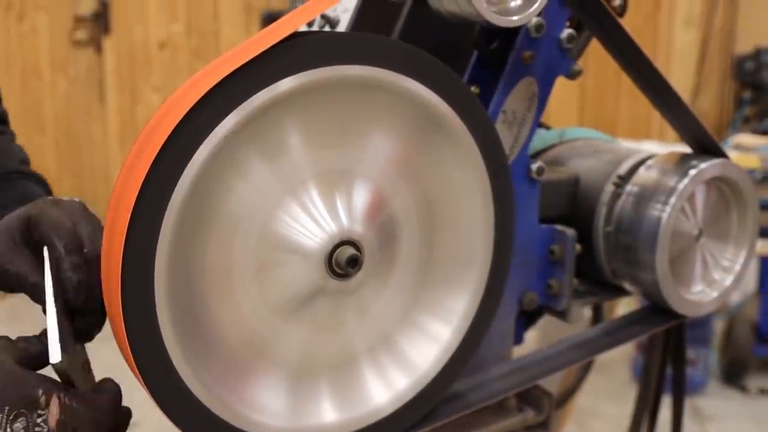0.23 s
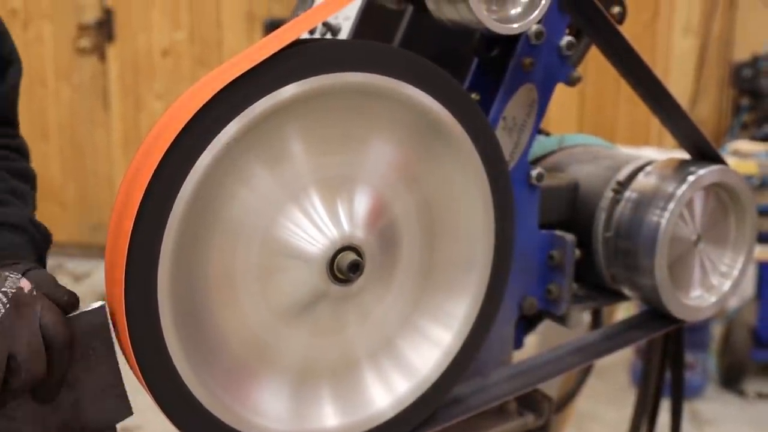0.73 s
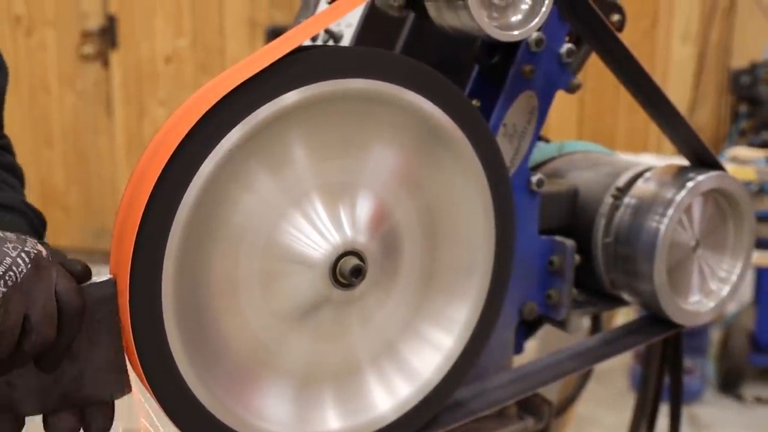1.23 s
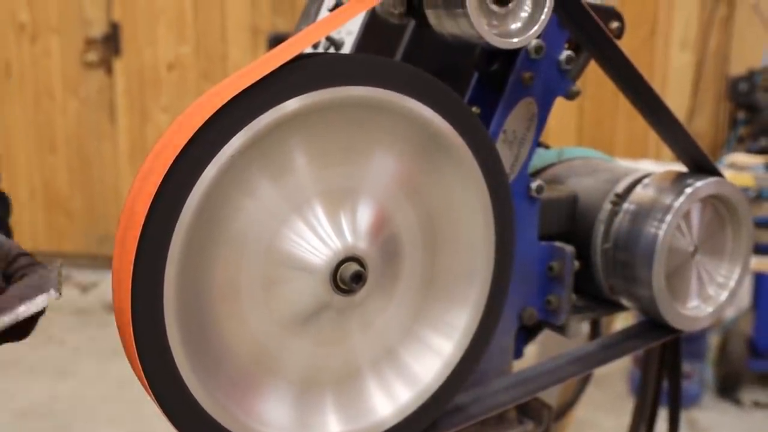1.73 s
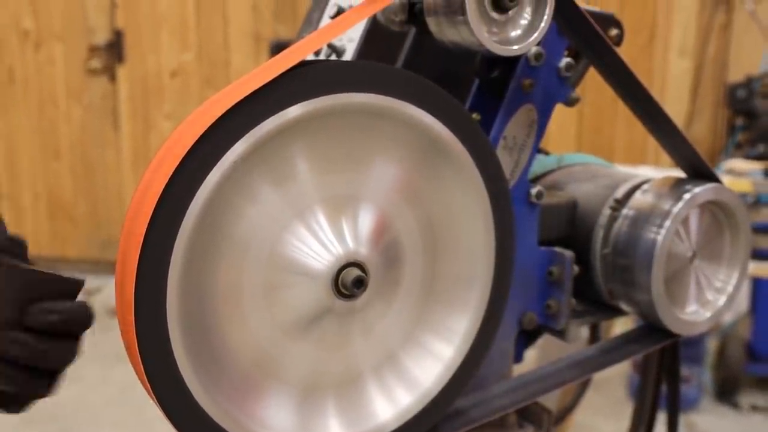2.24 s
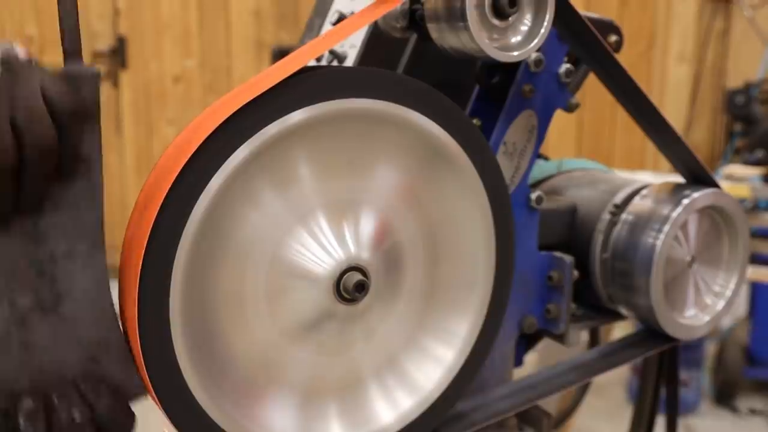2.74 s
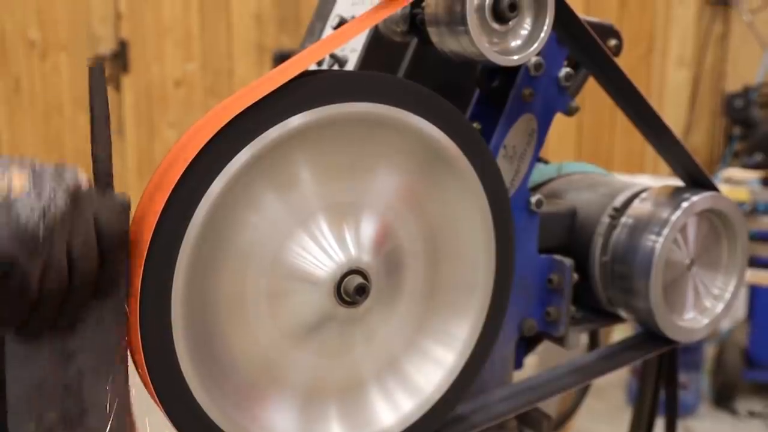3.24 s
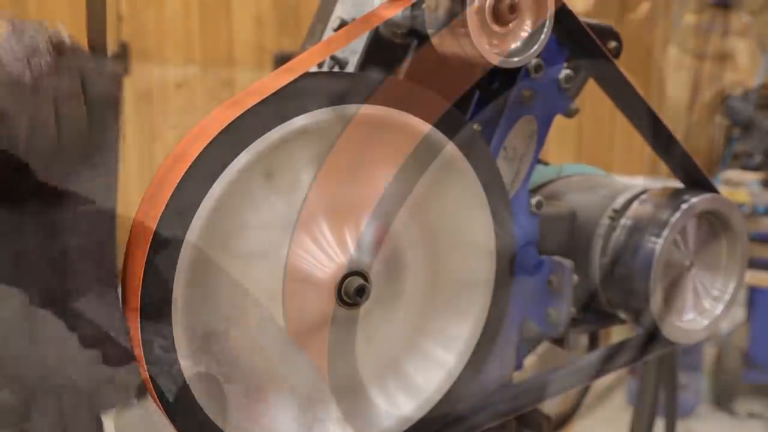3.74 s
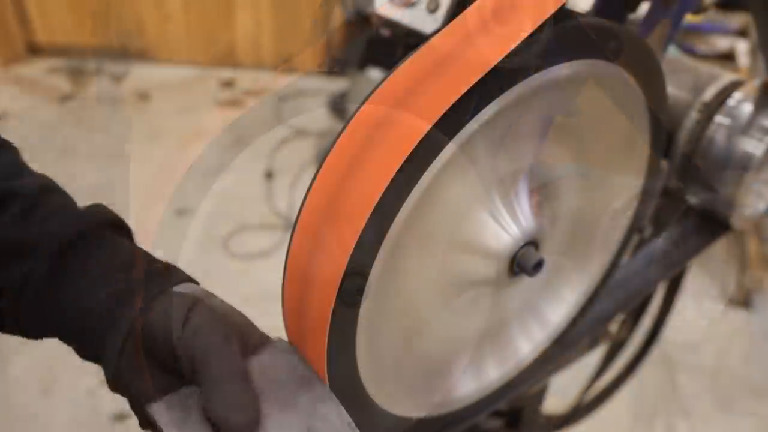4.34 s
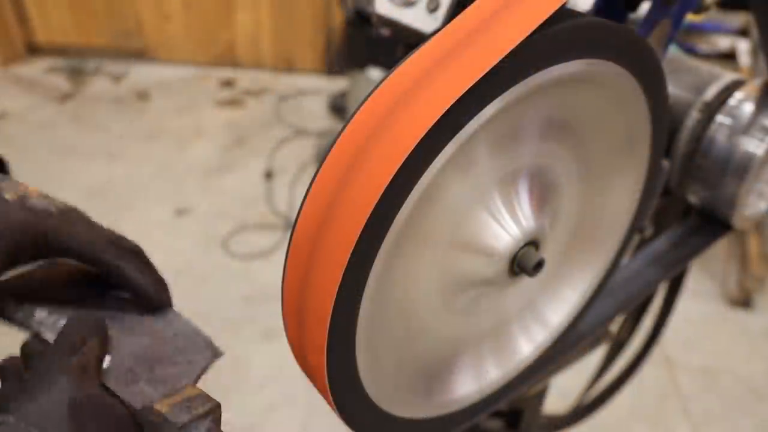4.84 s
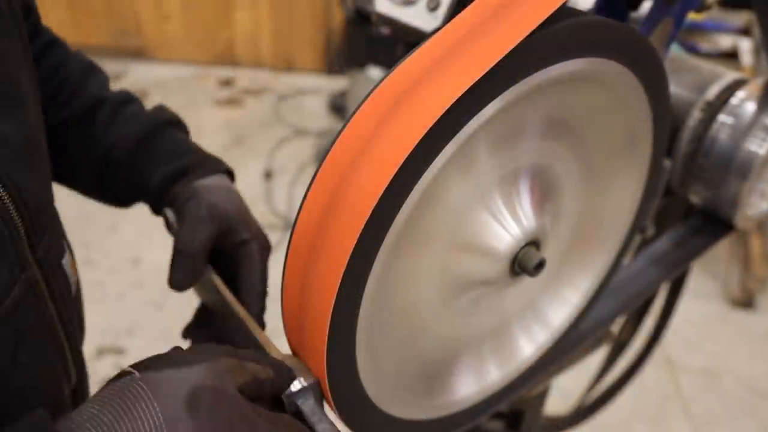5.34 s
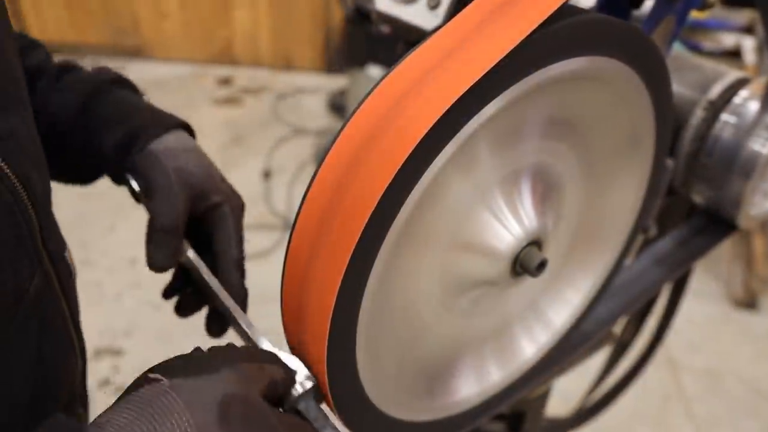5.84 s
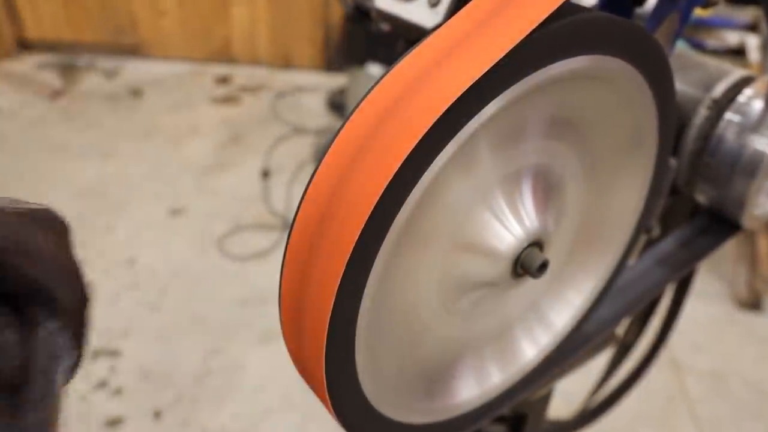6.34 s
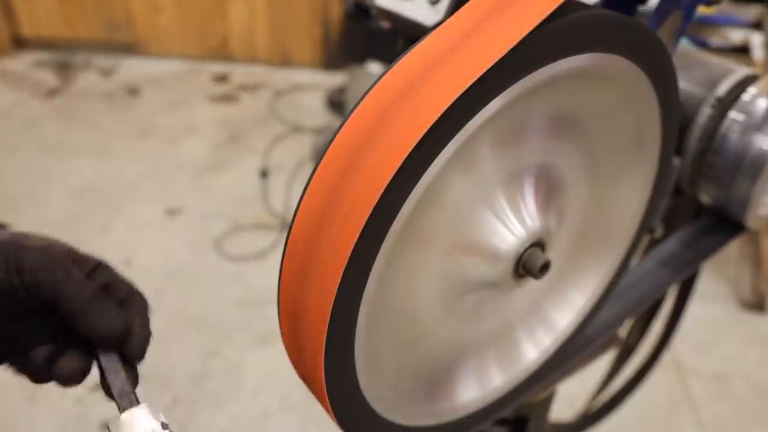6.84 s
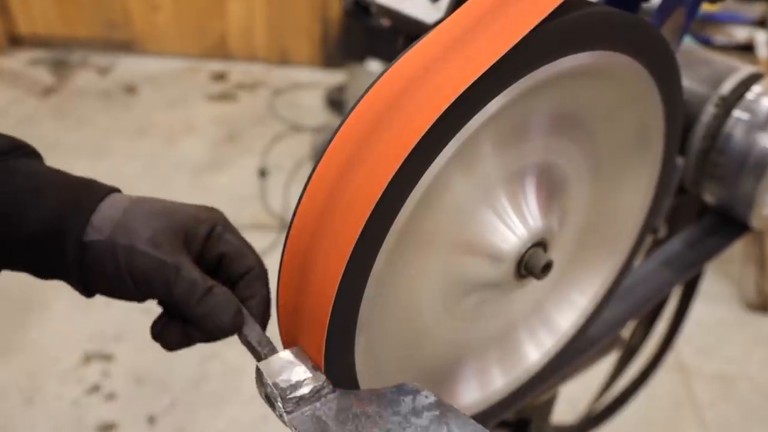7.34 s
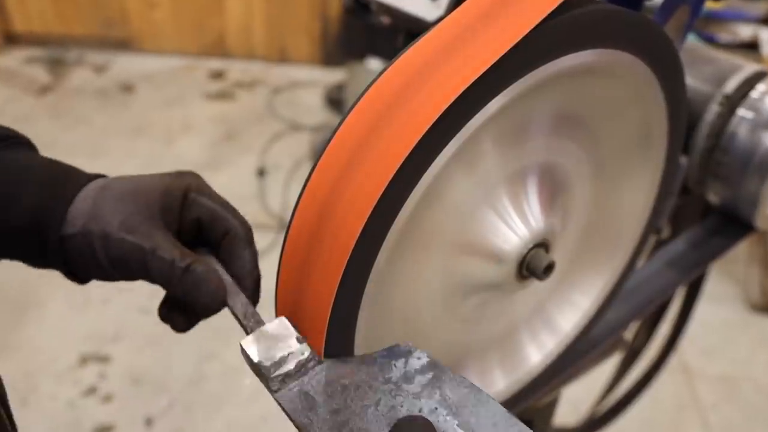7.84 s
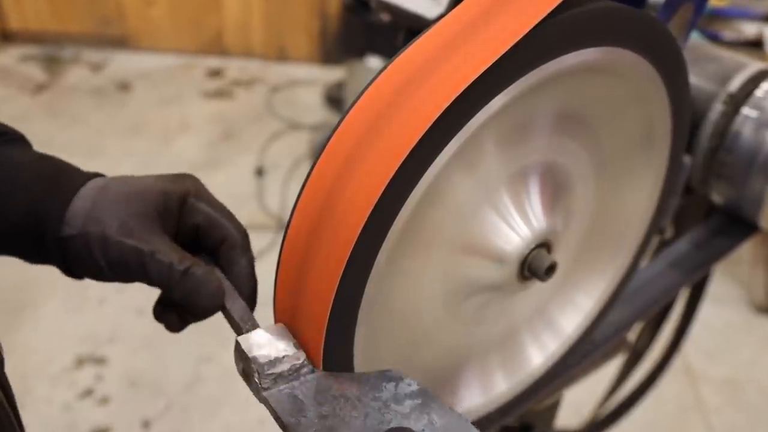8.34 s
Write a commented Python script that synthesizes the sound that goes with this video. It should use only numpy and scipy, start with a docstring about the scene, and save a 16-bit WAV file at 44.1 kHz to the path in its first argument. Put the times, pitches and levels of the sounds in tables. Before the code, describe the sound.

A belt grinder runs at constant high speed throughout, close by in a workshop: broad bright hiss, a rapid fluttering buzz from the repeating belt and a piercing cluster of motor whine. At 0 s a blade is just leaving the belt with a short scrape. From 0.9 to 1.6 s it grinds in strong, ringing passes, the motor humming lower and harder, with tiny squeals near the end. The machine runs free until two light knocks at 2.5 s, then uneven gritty presses follow to about 4 s. Between 3.7 and 4.9 s the sound crossfades to a second position with less whine; a thin squeal and a knock fall near 4 s. Short dabs come at 4.2-4.7 s, ending in a squeal and knock, then 5.1-6 s, with squeals near 5.8 s. Free running follows until faint, brief touches from 7.3 to 8.5 s, the hiss continuing to the end.

```python
"""A belt grinder runs in a workshop: the grit pattern of its belt repeats every lap, read out at belt speed.
A steel blade pressed on the belt loads the motor, makes the belt slip and rings under the grit;
it also squeals as shaped noise and knocks on the rest as decaying bursts.
Motor and wheels whine as sines that share one speed, over a hiss of air and rubber made of coloured noise.
The machine is heard from one place and then, after a fade, from another."""
import sys
import numpy as np
from scipy import signal
from scipy.fft import rfft, irfft
from scipy.io import wavfile
from scipy.ndimage import uniform_filter1d

SR = 44100
rng = np.random.default_rng(int(sys.argv[2]) if len(sys.argv) > 2 else 0)


def unload_audio(sound):
    """Save the sound as a 16-bit wav file, at the path given as the first command line argument."""
    columns = np.transpose(np.atleast_2d(sound))
    # keep every value between -1 and 1, then stretch to whole-number steps
    steps = np.round(np.clip(columns, -1, 1) * 32767)
    wavfile.write(sys.argv[1], SR, steps.astype(np.int16))


N = 379260
TIME, FREQ = np.arange(N) / SR, np.arange(N // 2 + 1) * SR / N  # s, Hz

# strong overtones of the lap: multiple, first_place_db, second_place_db
BELT_OVERTONES = [(6, -76, -78), (8, -66, -60), (10, -74, -72), (16, -66, -61), (24, -63, -58),
                  (25, -59, -60), (30, -66, -58), (41, -60, -60), (45, -55, -71), (54, -57, -59),
                  (57, -57, -56), (59, -53, -56), (64, -61, -55), (80, -51, -90), (97, -62, -54),
                  (101, -52, -56), (103, -56, -55), (122, -52, -58), (133, -51, -54), (135, -70, -53),
                  (140, -52, -54), (143, -52, -54), (164, -66, -56), (169, -48, -53), (170, -52, -59),
                  (177, -64, -50), (184, -55, -65), (198, -56, -51), (199, -52, -60), (201, -65, -55),
                  (208, -56, -53), (214, -49, -55), (222, -48, -52), (229, -53, -50), (233, -46, -54),
                  (237, -46, -56), (239, -47, -62), (242, -48, -58), (245, -51, -47), (251, -49, -61),
                  (254, -56, -46), (261, -50, -70), (263, -70, -48), (276, -44, -54), (278, -45, -48),
                  (281, -47, -46), (295, -45, -43), (297, -48, -45), (300, -45, -45), (312, -50, -44),
                  (315, -46, -45), (322, -43, -58), (323, -44, -60), (324, -46, -42)]
# weak overtones of the lap against the hiss: freq_hz, relative_db
WEAK_OVERTONES = [(150, -21), (300, 0), (1000, -10), (3000, -2.5), (6000, -4), (10000, -6), (15000, -1)]
# presses of the blade on the belt: start_s, length_s, load_hum_db, low_hum_db, ring_db, slip_percent
PRESSES = [(0, .09, -44, -55, -38, .1), (0.864, 0.37, -50.5, -72.5, -34, 0.02),
           (1.082, 0.3, -44.5, -56, -34.5, .04), (1.446, 0.17, -46.5, -58, -36, 0.098),
           (2.46, .17, -47, -66, -44, 0.061), (2.67, 0.092, -47.5, -60.5, -43, .04),
           (2.81, .05, -48, -65, -42, .07), (2.9, .27, -49.5, -63, -41, .09),
           (3.225, 0.11, -49, -68, -41, 0.037), (3.432, 0.069, -47.5, -65, -36.5, 0.057),
           (3.598, 0.13, -47, -57.5, -38, .08), (3.789, 0.043, -49, -66, -40, 0.13),
           (3.882, 0.057, -53, -61, -37, 0.15), (3.95, .04, -52, -66, -50, .14),
           (4.02, .07, -45, -61, -55, 0.15), (4.105, .02, -50, -68, -52, .13),
           (4.2, 0.076, -61, -79, -40, 0.1), (4.428, .04, -59, -74, -46, 0.076),
           (4.575, 0.045, -52, -76, -48, .1), (4.656, 0.056, -54, -72, -44, .12),
           (5.132, 0.054, -53, -69, -48, 0.021), (5.238, 0.069, -47.5, -71, -46, .03),
           (5.35, 0.087, -49.5, -68, -44, .04), (5.478, 0.11, -45, -60.5, -46, .07),
           (5.769, 0.094, -50, -62, -38, .14), (5.896, 0.079, -46.5, -59, -44, 0.13),
           (7.26, .04, -52, -69.5, -41, .02), (7.36, 0.044, -55, -70, -45, 0.022),
           (7.45, 0.14, -61, -67, -41, .06), (7.79, 0.038, -61, -74, -43, .08),
           (7.92, 0.09, -60, -63.5, -48, 0.098), (8.115, .05, -58, -63, -48, 0.16),
           (8.447, 0.09, -65.5, -67, -51.5, 0.096)]
# change of the ring over a longer press as the blade turns: start_s, change_db
BLADE_TURNS = [(.86, 7), (1.09, -9), (1.45, 2), (2.9, -4), (3.6, -12), (5.48, 3)]
# grit noise through the body of the blade, against its control: freq_hz, width_hz, relative_db
BODY_MODES = [(748, 92, -11), (999, 100, -17.5), (1076, 156, -10.5), (2780, 1200, -4), (5070, 1230, 4.5),
              (11000, 3700, 2)]
# ring of the blade common to both ports, against its control: freq_hz, width_hz, relative_db
RING_MODES = [(5956, 210, -3.5), (5570, 440, -3.5)]
# ring of the blade that differs between the ports: freq_hz, width_hz, relative_db
RING_SIDE_MODES = [(5750, 500, -3), (8500, 380, -3.5)]
# short squeals of the blade: start_s, length_s, freq_hz, width_hz, relative_db
SQUEALS = [(.05, .05, 8500, 450, -43), (1.36, .05, 8600, 350, -45), (1.58, .04, 8400, 350, -45),
           (3.98, .22, 9070, 130, -48), (4.22, .06, 6000, 200, -47), (4.69, .045, 6000, 220, -36),
           (5.76, .11, 8660, 350, -43), (5.76, .1, 13000, 250, -40), (5.93, .05, 11900, 500, -43),
           (7.95, .06, 5600, 200, -43)]
# knocks of the blade on the rest: start_s, burst_db, pitch_hz, t60_s, first_swing_db above the burst
KNOCKS = [(2.533, -48, 330, .1, 3), (2.552, -52, 240, .07, 3), (4.034, -49, 440, .25, 16),
          (4.078, -52, 300, .12, 4), (4.705, -56, 300, .06, 6)]
# hum of the loaded motor against the load hum: freq_hz, relative_db
LOAD_HUM = [(480.3, -15), (960.6, -.5), (1041, -12)]
# the one whine tone that swells and sinks: time_s, relative_db
SWELL = [(0.0, -51), (0.26, -55.5), (1.1, -47), (1.34, -55), (1.36, -47), (1.48, -59), (1.63, -55),
         (2.54, -54.5), (2.92, -48), (4.24, -61), (5.29, -48), (5.72, -52), (7.21, -48), (7.83, -51),
         (8.55, -47.5), (8.6, -53)]
# whine of motor and wheels: freq_hz, first_place_db, second_place_db
WHINE = [(160, -80, -84), (280, -65, -73), (440, -72, -73), (480, -68, -66), (600, -66, -67),
         (845, -58, -73), (883, -61, -64), (921, -64, -66), (1121, -61, -62), (1523, -67, -61),
         (1601, -64, -64), (2881, -54, -68), (3203, -58, -61), (3522, -61, -61), (3842, -57, -63),
         (4162, -56, -68), (4322, -50, -56), (4482, -44, -59), (4642, -46, -58), (4802, -41, -46),
         (4963, -43, -44), (5123, -55, -56), (5283, -43, -56), (5443, -45, -55), (5603, -56, -58),
         (5763, -53, -62)]
# density of the hiss, one list a place: freq_hz, relative_db
HISS = [
    [(18, -71), (30, -48), (226, -26.5), (286, -28.5), (537, -19.5), (838, -11), (1310, -9.5), (1420, -9),
     (2800, -7), (4150, -10), (4860, -3.5), (6310, -4.5), (9110, -7), (13900, 0), (15800, -0.5)],
    [(18, -77), (30, -62), (232, -29), (382, -26), (537, -21), (1150, -12), (1340, -14.5), (1450, -10.5),
     (1610, -13), (2390, -9.5), (2800, -9.5), (4490, -8.5), (4860, -7), (7990, -5.5), (15800, -1)],
]
# total level of the hiss, one value a place: level_db
HISS_LEVEL = [-28, -29]
# throb of the hiss as the belt passes the wheels: beats_per_lap, depth (0-1)
THROB = [(1, 0.09), (4, 0.14), (8, 0.19), (9, 0.12), (11, 0.18)]
# resonances and gaps of the frame, one list a place: freq_hz, width_hz, change_db
FRAME = [
    [(724, 51, 5.5), (1670, 520, -5), (2046, 360, 0.5), (2400, 220, -4), (3360, 280, 4), (4070, 150, -5.5),
     (6120, 820, -5), (8770, 67, -4), (9140, 270, 0), (10950, 790, 3), (13680, 250, -15), (14000, 550, 3)],
    [(743, 140, 8), (1235, 98, 5), (2040, 110, 1.5), (2440, 140, -7.5), (3730, 280, -2.5), (6350, 38, 5),
     (8530, 330, -3), (8560, 150, 5), (9880, 200, -6), (11700, 340, -5), (13400, 180, 0), (14800, 760, 4.5)],
]
# level of left minus right, one list a place: freq_hz, difference_db
PAN = [
    [(60, -2), (110, 6), (200, -3), (380, 5.5), (700, 4.5), (1290, 5.0), (2380, 5), (4400, 2), (8120, 0.5),
     (15000, -1)],
    [(60, 0.0), (110, 0.0), (200, -0.5), (380, 5), (700, 3.5), (1290, 7.5), (2380, 2.5), (4400, 1),
     (8120, 1), (15000, -3)],
]
# phase by which the left port leads, one list a place: freq_hz, lead_rad
LEAD = [
    [(2000, 0), (5000, 0.087), (8000, -0.6), (10000, -0.5), (12000, -0.5), (15000, -.5)],
    [(2000, 0.27), (5000, -0.73), (8000, -0.081), (10000, -0.95), (12000, -.4), (15000, -.5)],
]
# sound that differs between the ports, against the common sound, one list a place: freq_hz, relative_db
WIDE = [
    [(60, -16), (130, -18), (300, -4), (700, -19), (1400, -24), (3000, -13), (4300, -17), (5500, -6),
     (8000, -2.5), (12000, -2), (15500, -5)],
    [(60, -14), (130, -29), (300, -22), (700, -29), (1400, -21), (2400, -6), (3500, -46), (5000, -9),
     (8000, -4), (12000, -1.5), (15500, -7)],
]
# sudden drops of the machine level that creep back: start_s, drop_db, recovery_s
DIPS = [(.1, -1.2, 0.23), (1.62, -0.4, 0.24), (4.73, -3.5, 0.31), (7.2, -0.44, 1.5)]

BELT_HZ, SHAFT_HZ = 48.5, 160.1  # laps a second; turns a second
FLAP_BEATS, FLAP_DAMP_DB = 8, -70  # low flap of the belt: beats a lap; dB per % of slip
LAP_POINTS = 2 ** 14  # samples in one stored lap
ATTACK_S, RELEASE_S, SETTLE_S = .05, .045, .12  # of a press; the belt needs longer to grip again
IDLE_DB, IDLE_SLIP = (-61.5, -69, -52), 0.0086  # load hum, low hum and ring between presses; slip %
HAND_DB = 1.3  # spread of the unsteady hands
SWING_S, KNOCK_LOW_HZ = .0012, 200  # decay of the first swing; the light blade gives little below
SAG, OVERSHOOT = .004, .011  # slowing under load and overrun after it: shares of speed at full load
LOADED_DB, REGAIN_S = -56, .045  # low hum at full load; time to regain speed
RUMBLE_HZ, RUMBLE_WAVER_DB = 130, 3  # upper edge of the wavering bass
FADE_OUT_S, FADE_IN_S = (3.68, 4.37), (3.81, 4.9)  # start, end; even in amplitude
TOP_HZ = 15760


def undb(db):
    """Logarithmic level: the amplitude gain of a level in dB."""
    return np.exp(np.asarray(db) * np.log(10) / 20)


def shape(table, hz):
    """Spectral envelope: table values at hz, joined on a log frequency axis."""
    f, value = np.transpose(table)
    return np.interp(np.log(hz + 1), np.log(f), value)


def walk(rate):
    """Random fluctuation: levels held 1 / rate s and slewed twice, spread near 1."""
    hold = int(SR / rate)
    steps = np.repeat(rng.standard_normal(N // hold + 1), hold)
    return 1.344 * uniform_filter1d(uniform_filter1d(steps, hold), hold)[:N]


def ramp(start, length):
    """Linear growth: rises evenly from 0 to 1."""
    return np.clip((TIME - start) / length, 0, 1)


def filtered(noise, gain):
    """Linear filtering: unit white noise takes the level per root Hz given by gain."""
    return irfft(rfft(noise) * gain * np.sqrt(SR / 2), N)


def coloured(gain):
    """Coloured noise: fresh white noise through a spectral gain."""
    return filtered(rng.standard_normal(N), gain)


def tones(rows, speed, flicker_db):
    """Rotational harmonics: sines that follow the motor speed, each wavering in level."""
    turn = 2 * np.pi * np.cumsum(speed) / SR
    out = 0
    for hz, db in rows:
        level = np.sqrt(2) * undb(db + flicker_db * walk(9))
        out = out + level * np.sin(hz * turn + 2 * np.pi * rng.random())
    return out


def machine(place, laps, slip, strong):
    """Loss of periodicity by slip: the belt pattern gives way to the hiss."""
    def colour(hz):
        frame = sum(db * np.exp(-2 * ((hz - f) / w) ** 2) for f, w, db in FRAME[place])
        return shape(HISS[place], hz) + frame

    # brings the power summed over the band to the total level
    offset_db = HISS_LEVEL[place] - 10 * np.log10(np.sum(undb(2 * colour(FREQ))) * FREQ[1])

    def density_db(hz):
        return colour(hz) + offset_db

    pattern = belt_pattern(place, laps, slip, strong, density_db) * undb(0.67 * walk(25) - 12.3 * slip)
    return pattern + hiss(laps, density_db) * undb(.5 * walk(12) + 11.6 * slip)


def belt_pattern(place, laps, slip, strong, density_db):
    """Periodicity: one lap of grit, read round and round, gives overtones of the lap rate."""
    hz = BELT_HZ * np.arange(340)
    scatter_db = 5.3 * rng.standard_normal(len(hz))
    angle = 2 * np.pi * rng.random(len(hz))
    size = undb(density_db(hz) + shape(WEAK_OVERTONES, hz) + scatter_db) * np.sqrt(BELT_HZ)
    for row in strong:
        size[round(row[0])] = undb(row[1 + place])
    flap, size[FLAP_BEATS] = size[FLAP_BEATS], 0
    lap = irfft(size * np.exp(1j * angle) * LAP_POINTS / np.sqrt(2), LAP_POINTS)
    pattern = np.interp(laps % 1 * LAP_POINTS, np.arange(LAP_POINTS + 1), np.append(lap, lap[0]))
    # the blade damps the flap
    flap_level = np.sqrt(2) * flap * undb(FLAP_DAMP_DB * slip)
    return pattern + flap_level * np.sin(2 * np.pi * FLAP_BEATS * laps)


def pressing(idle, sizes, release):
    """Contact envelope: attack, hold and release of every press, over an idle value."""
    out = np.full(N, idle)
    for (s, length, *_), size in zip(PRESSES, sizes):
        on, end = s - ATTACK_S / 2, s + length
        span = slice(max(int(on * SR), 0), int((end + release) * SR))
        contact = np.interp(TIME[span], [on, on + ATTACK_S, end, end + release], [0, 1, 1, 0])
        out[span] = np.maximum(out[span], size * contact)
    return out


def belt_slip():
    """Friction: unsteadiness of the belt speed in %, raised by each press."""
    return uniform_filter1d(pressing(IDLE_SLIP, np.transpose(PRESSES)[-1], SETTLE_S), SR // 20)


def press_db():
    """Contact force: each press sets load hum, low hum and blade ring in dB."""
    load, low, ring = [20 * np.log10(pressing(undb(idle), undb(column), RELEASE_S))
                       for idle, column in zip(IDLE_DB, np.transpose(PRESSES)[2:5])]
    for s, db in BLADE_TURNS:
        # the turn belongs to the press nearest in time
        start, length = min(PRESSES, key=lambda row: abs(row[0] - s))[:2]
        during = (TIME > start) * (TIME < start + length)
        ring = ring + db * (ramp(start, length) - .5) * during
    return load + HAND_DB * walk(15), low, ring + HAND_DB * walk(15)


def grit(modes):
    """Resonance under random impact: sharp grains ring steep modes of a blade too small for bass."""
    grains = rng.standard_normal(N) * undb(2.2 * rng.exponential(size=N))
    gain = sum(undb(db) / (1 + 1j * (FREQ - f) / w) ** 3 / np.sqrt(w) for f, w, db in modes)
    gain *= FREQ ** 4 / (FREQ ** 4 + 380.0 ** 4)
    return filtered(grains / grains.std(), gain) * undb(1.1 * walk(60))


def blade(ring_modes, load_db, ring_db):
    """Forced vibration: the body follows the load, the ring the blade angle; the hands slew both."""
    load_db, ring_db = (uniform_filter1d(db, SR // 40) for db in (load_db, ring_db))
    return undb(load_db) * grit(BODY_MODES) + undb(ring_db) * grit(ring_modes)


def squeals():
    """Selective excitation: grit briefly catches one mode of the blade."""
    out = 0
    for s, length, *mode in SQUEALS:
        gate = uniform_filter1d(1. * (TIME > s) * (TIME < s + length), SR // 60)
        out = out + gate * grit([mode])
    return out


def knocks():
    """Damped impact: a sharp first swing and a dying burst of noise around a pitch."""
    out = 0
    for s, db, hz, t60, swing_db in KNOCKS:
        burst = coloured(1 / (1 + 1j * (FREQ / hz - hz / (FREQ + 1))) ** 2 / np.sqrt(hz))
        late = np.abs(TIME - s)
        swing = undb(swing_db) * np.sin(2 * np.pi * hz * late) * np.exp(-late / SWING_S)
        out = out + (burst + swing) * (TIME > s) * undb(db - 60 * late / t60)
    return signal.sosfilt(signal.butter(4, KNOCK_LOW_HZ, "high", fs=SR, output="sos"), out)


def shaft(low_db):
    """Inertia: shaft speed, 1 when steady, sags as load comes on and overshoots as it goes."""
    load = np.minimum(undb(low_db - LOADED_DB), 1)
    keep = np.exp(-1 / (REGAIN_S * SR))
    # the load less its own running mean
    change = load - signal.lfilter([1 - keep], [1, -keep], load, zi=[load[0] * keep])[0]
    return 1 - np.where(change > 0, SAG, OVERSHOOT) * change


def hum(speed, load_db, low_db):
    """Shaft harmonics: two groups of tones grow with the load, and one tone swells by its table."""
    loaded = undb(load_db + 1.1 * walk(30)) * tones(LOAD_HUM, speed, .6)
    low = undb(low_db) * tones([(2 * SHAFT_HZ, -1.5), (4 * SHAFT_HZ, -6)], speed, 0.64)
    swell_db = np.interp(TIME, *np.transpose(SWELL))
    return loaded + low + undb(swell_db) * tones([(9 * SHAFT_HZ, -.5)], speed, .8)


def whine(place, speed):
    """Rotational tones: motor and wheels whine at pitches tied to the shaft speed."""
    return tones([(row[0], row[1 + place]) for row in WHINE], speed, 1.1)


def hiss(laps, density_db):
    """Amplitude modulation: broadband noise throbs with the lap while its bass wavers at random."""
    throb = 1
    for beats, depth in THROB:
        throb = throb + depth * np.sin(2 * np.pi * (beats * laps + rng.random()))
    gain = undb(density_db(FREQ))
    bass = 1 / (1 + (FREQ / RUMBLE_HZ) ** 4)  # share of the power
    rumble = coloured(gain * np.sqrt(bass)) * undb(RUMBLE_WAVER_DB * walk(6))
    return coloured(gain * np.sqrt(1 - bass)) * throb + rumble


def fading():
    """Superposition by cross-fade: gain of each place, with brief dips in level."""
    dips = undb(sum(db * (TIME > s) * np.exp(-np.abs(TIME - s) / back) for s, db, back in DIPS))
    (a, b), (c, d) = FADE_OUT_S, FADE_IN_S
    return [dips * (1 - ramp(a, b - a)), dips * ramp(c, d - c)]


def two_ports(place, mid, other):
    """Interaural difference: level and phase gaps as side over mid, plus sound that differs."""
    lean = np.tanh(shape(PAN[place], FREQ) * np.log(10) / 40 + .5j * shape(LEAD[place], FREQ))
    side = irfft(lean * rfft(mid) + undb(shape(WIDE[place], FREQ)) * rfft(other), N)
    return np.array([mid + side, mid - side])


def scene():
    """Superposition: both places, each spread over the two ports, faded one into the other."""
    (load_db, low_db, ring_db), slip = press_db(), belt_slip()
    laps = np.cumsum(BELT_HZ * (1 + slip / 100 * walk(30))) / SR
    speed = shaft(low_db) + 0.000588 * walk(40)
    work = blade(RING_MODES, load_db, ring_db) + squeals() + knocks() + hum(speed, load_db, low_db)
    work_side = blade(RING_SIDE_MODES, load_db, ring_db) + undb(3) * squeals() + knocks()
    fades = fading()
    # the work passes quickly to the second place once that is the louder
    first = (fades[0] > fades[1]).astype(float)
    near = [uniform_filter1d(first, SR // 20), uniform_filter1d(1 - first, SR // 20)]
    out = 0
    for place in range(2):
        running = machine(place, laps, slip, BELT_OVERTONES) + whine(place, speed)
        mid = fades[place] * running + near[place] * work
        other = fades[place] * machine(place, laps, slip, []) + near[place] * work_side
        out = out + two_ports(place, mid, other)
    return out


def record(dry):
    """Band limitation: the recorder cuts the top steeply."""
    return signal.sosfilt(signal.ellip(16, .3, 70, TOP_HZ, fs=SR, output="sos"), dry)


dry = scene()
out = record(dry)
unload_audio(out)
```